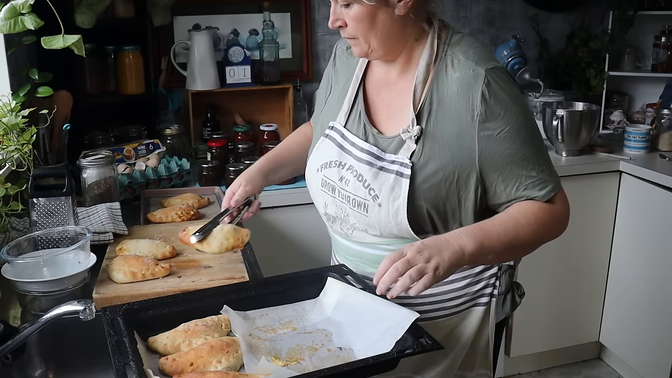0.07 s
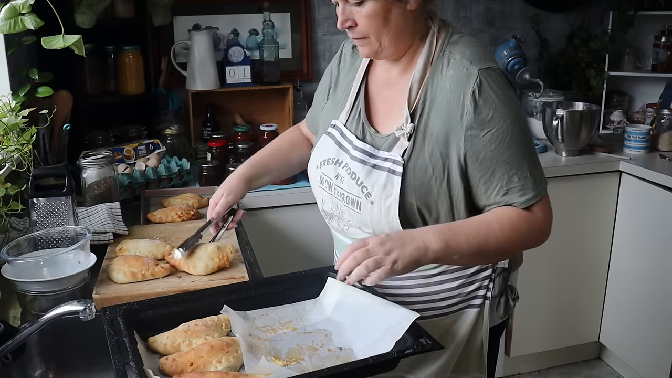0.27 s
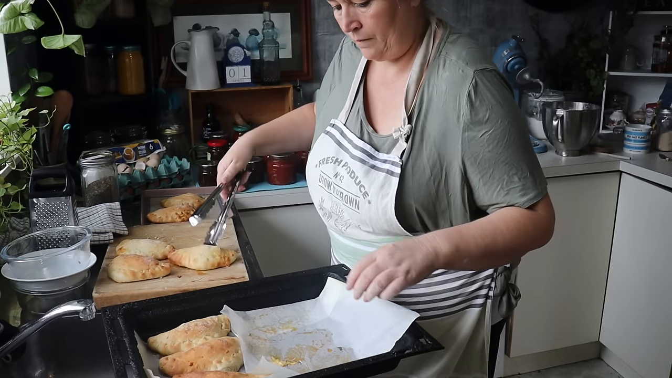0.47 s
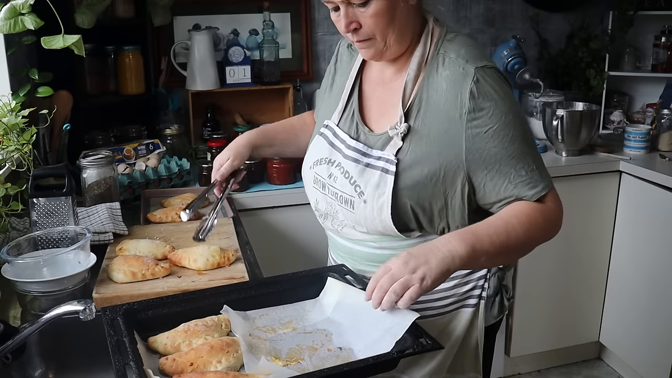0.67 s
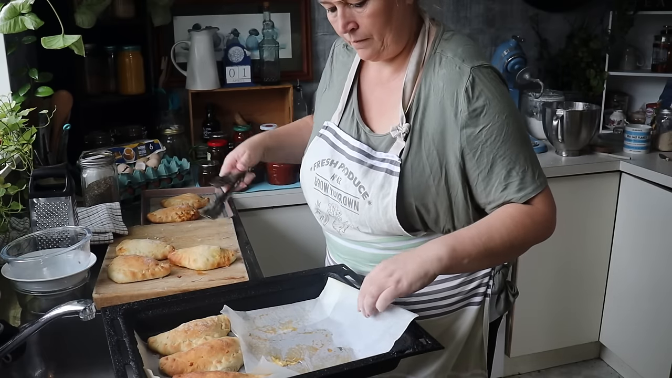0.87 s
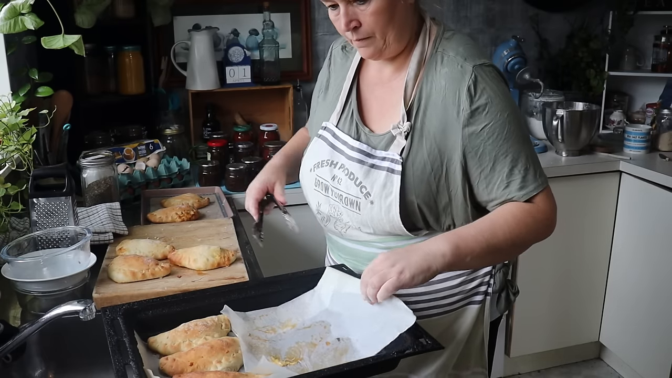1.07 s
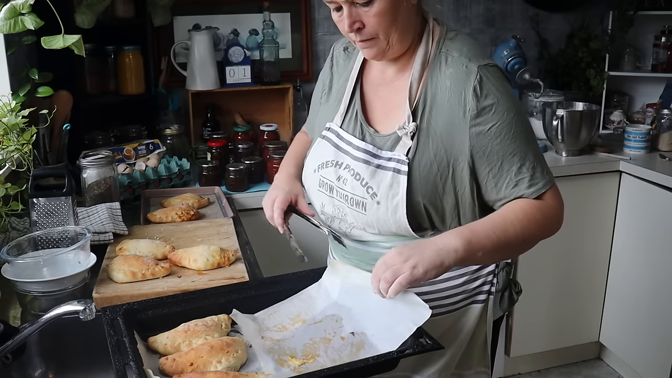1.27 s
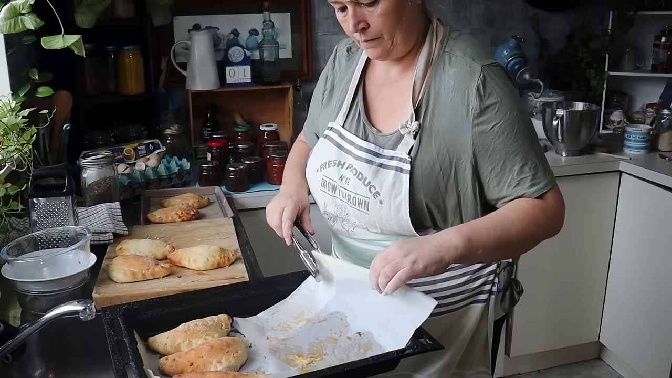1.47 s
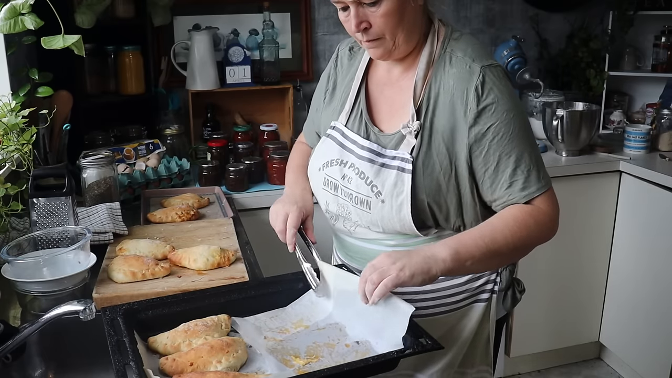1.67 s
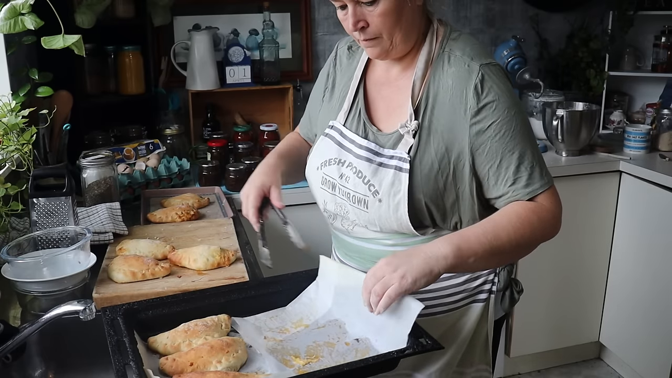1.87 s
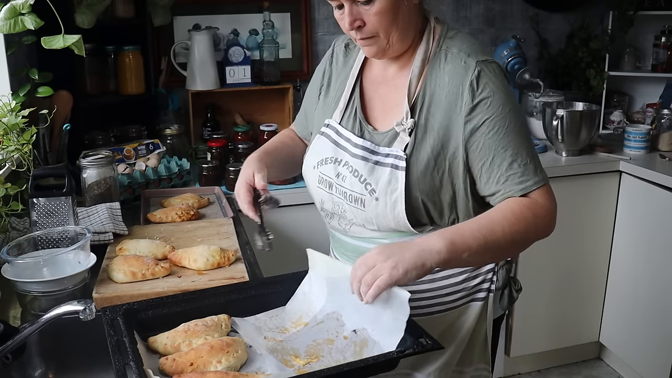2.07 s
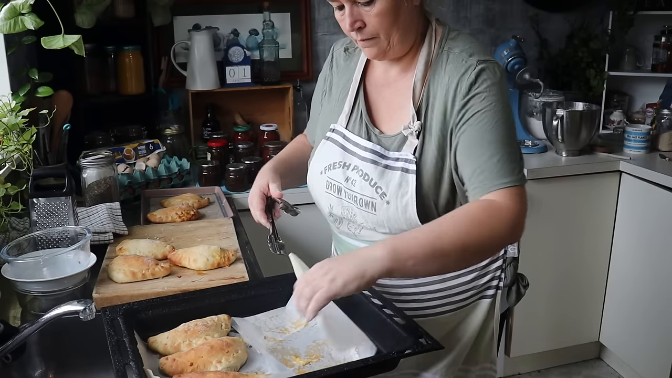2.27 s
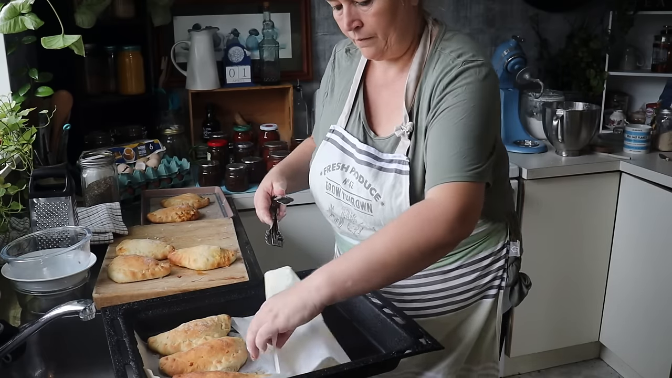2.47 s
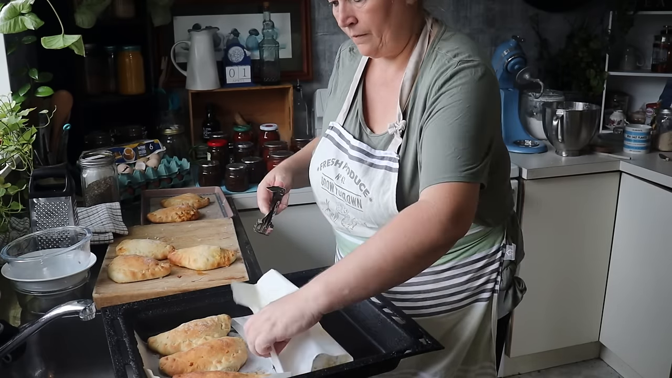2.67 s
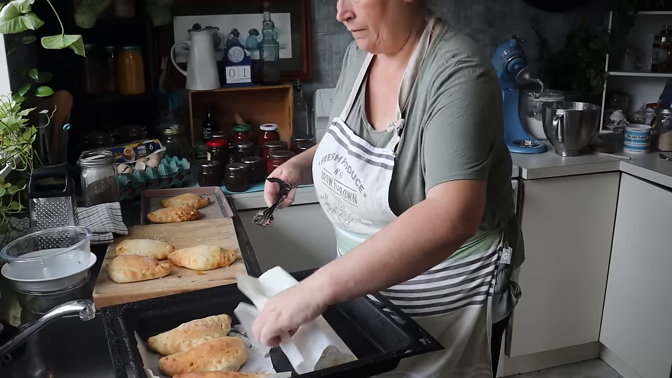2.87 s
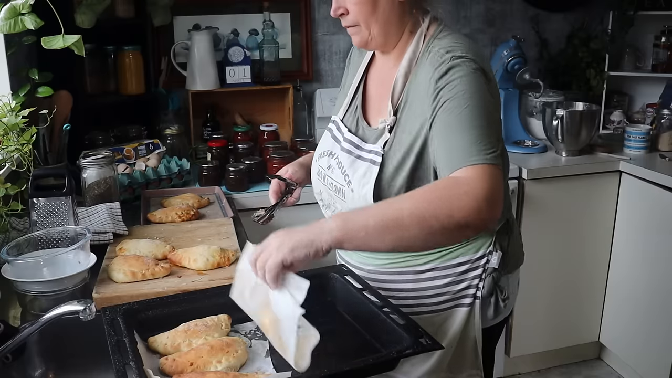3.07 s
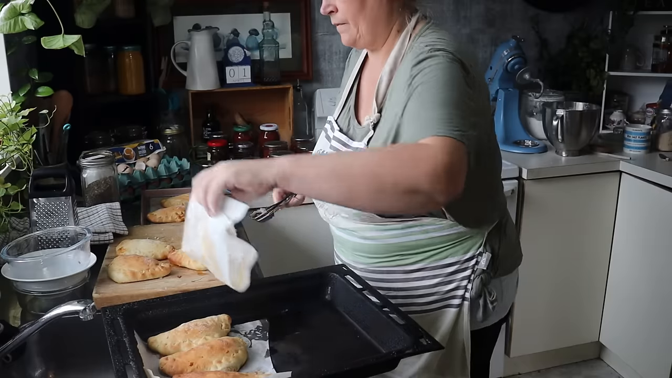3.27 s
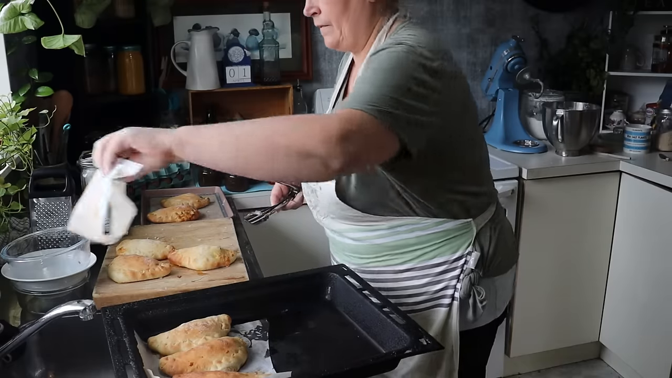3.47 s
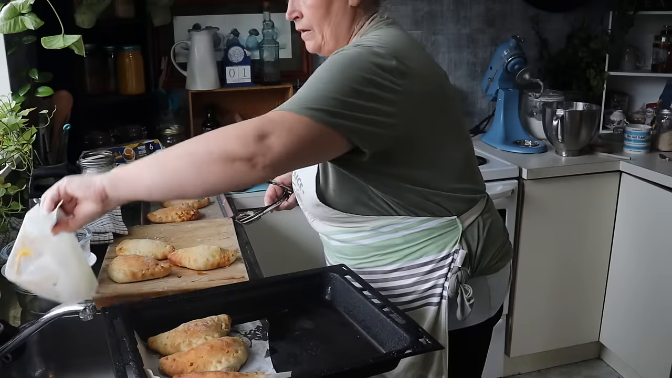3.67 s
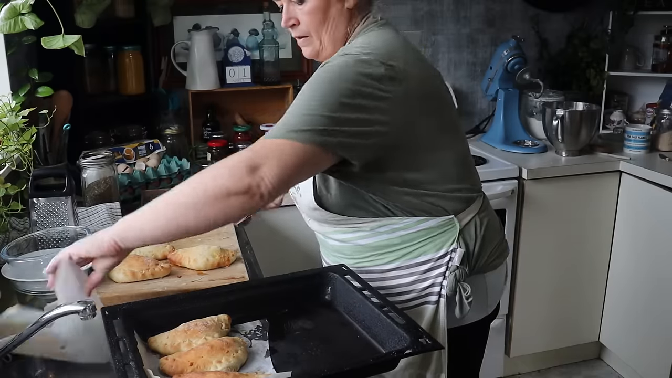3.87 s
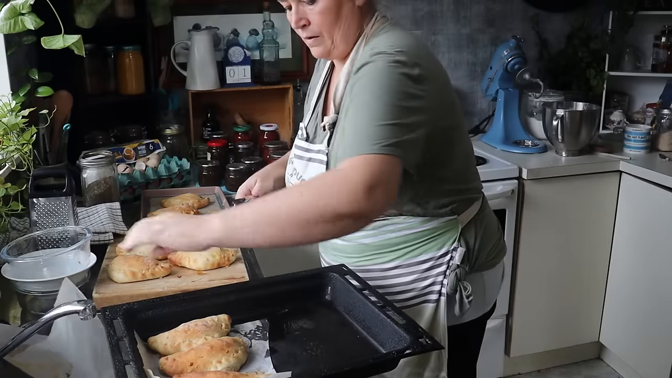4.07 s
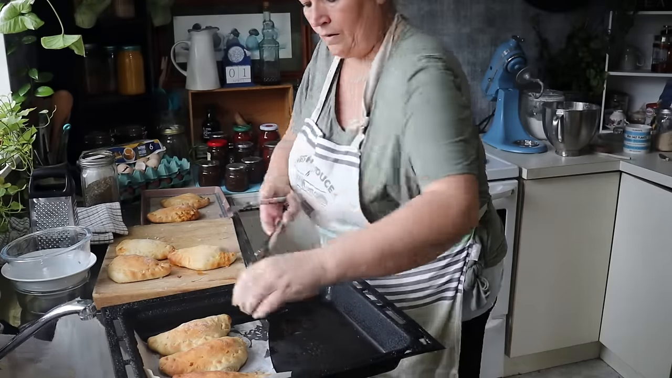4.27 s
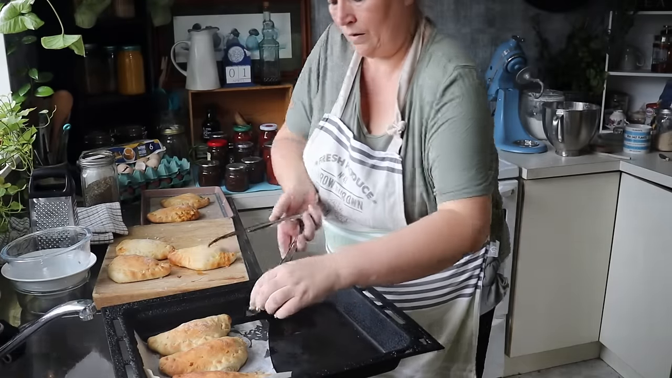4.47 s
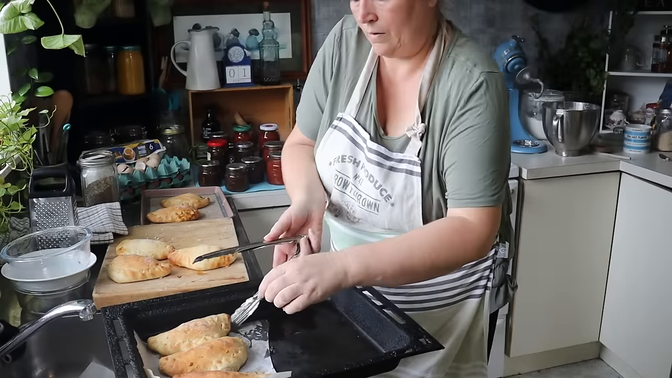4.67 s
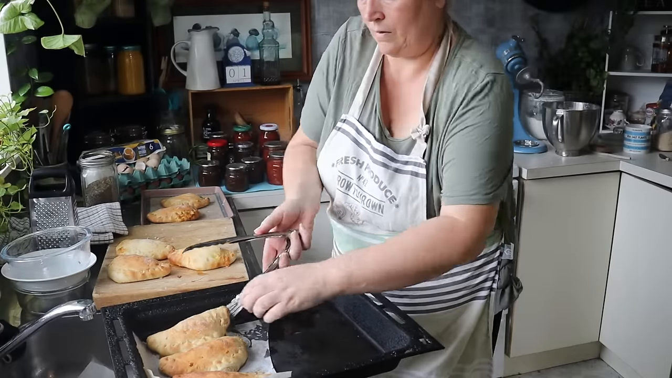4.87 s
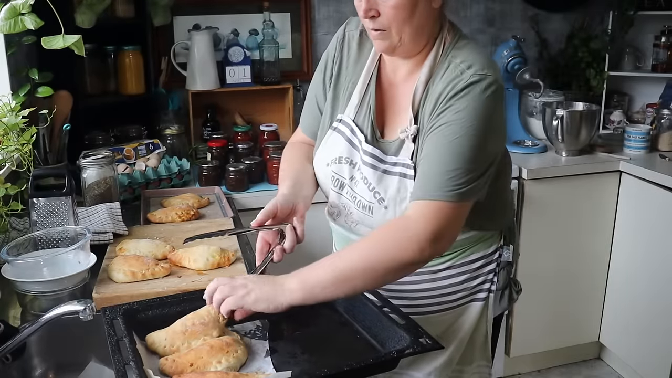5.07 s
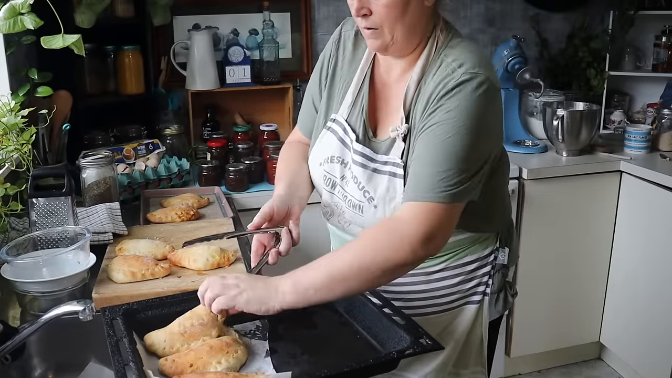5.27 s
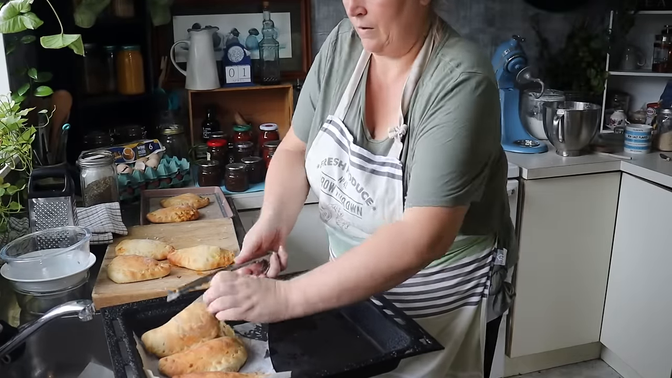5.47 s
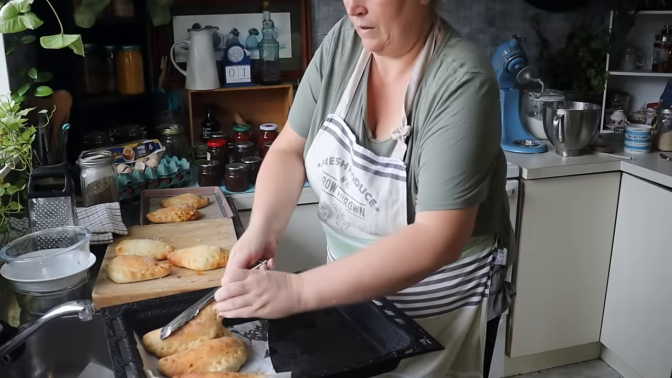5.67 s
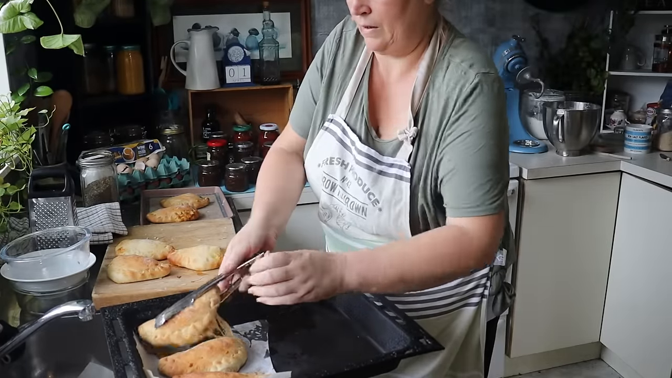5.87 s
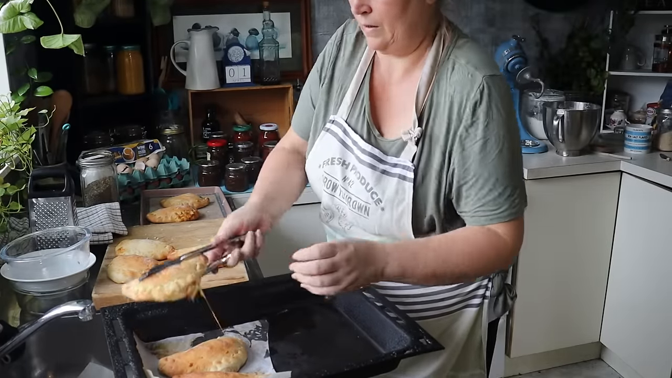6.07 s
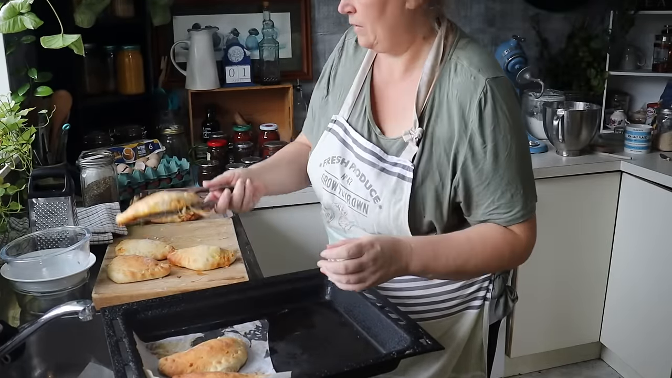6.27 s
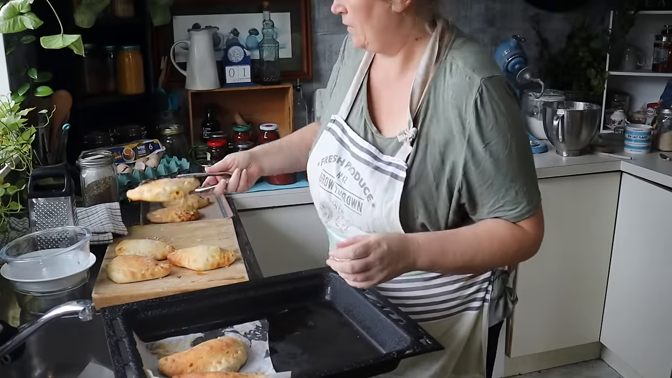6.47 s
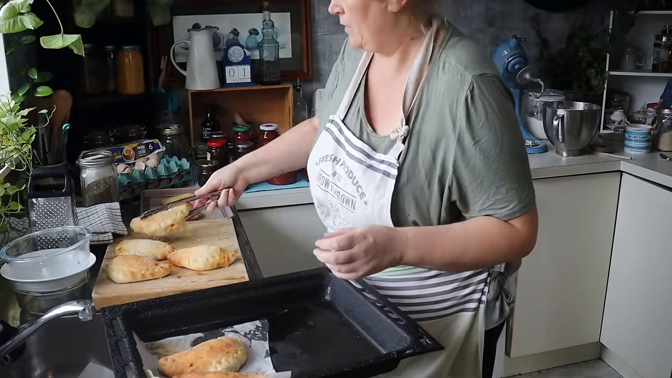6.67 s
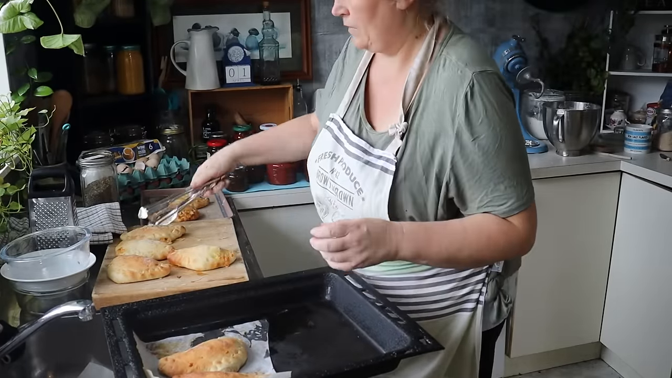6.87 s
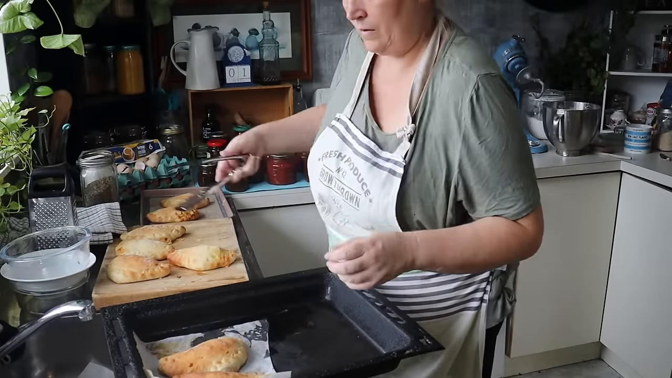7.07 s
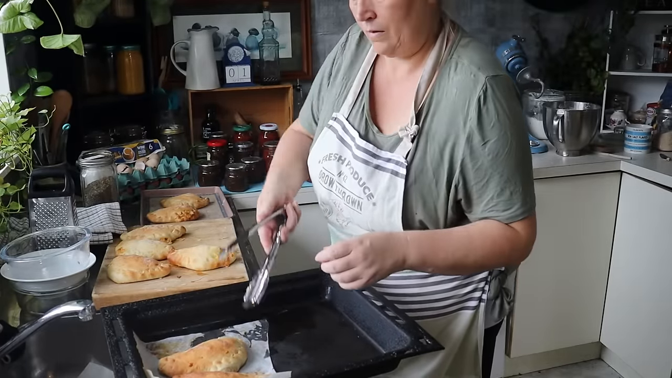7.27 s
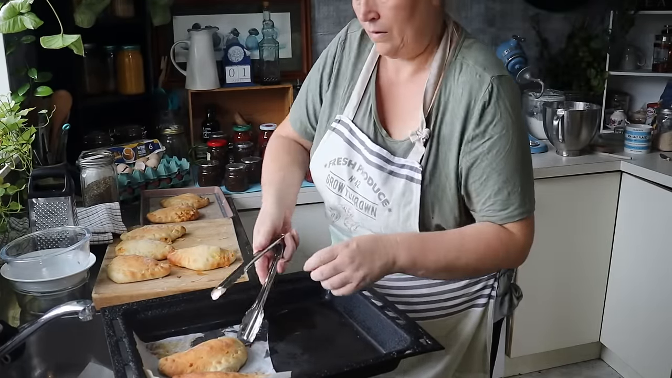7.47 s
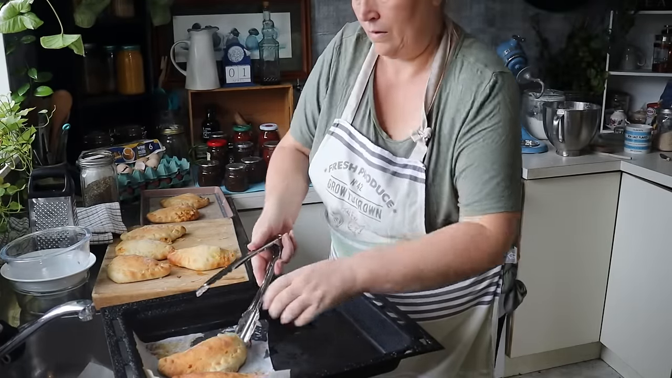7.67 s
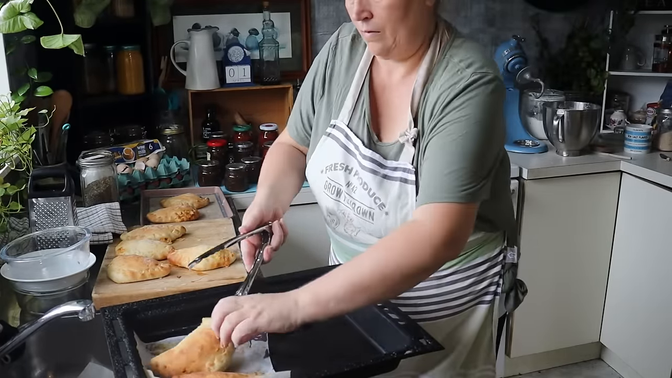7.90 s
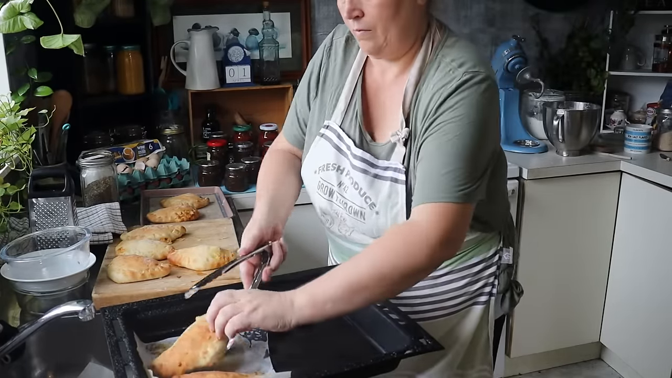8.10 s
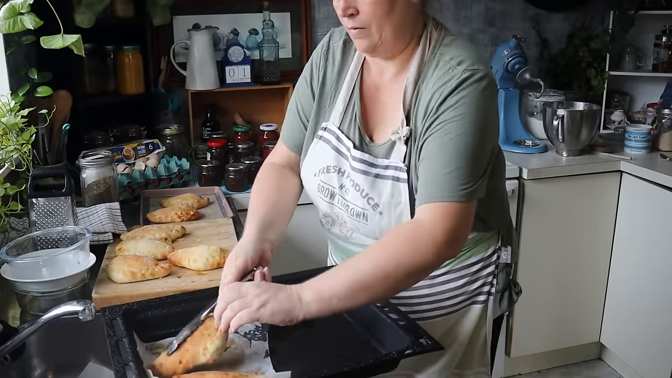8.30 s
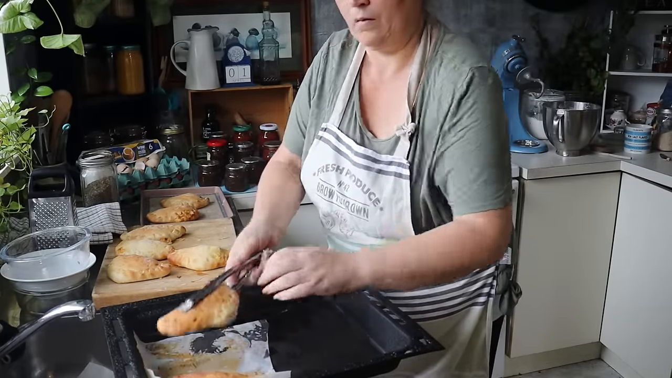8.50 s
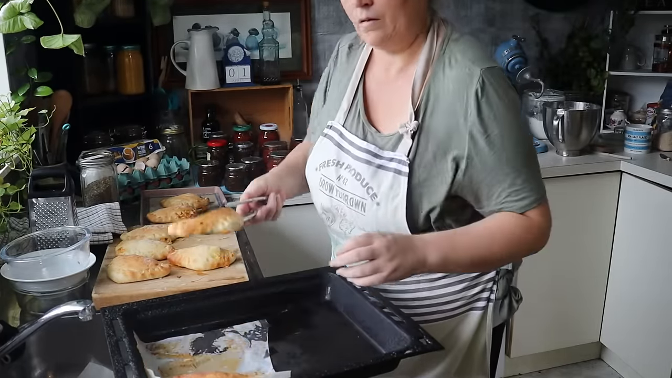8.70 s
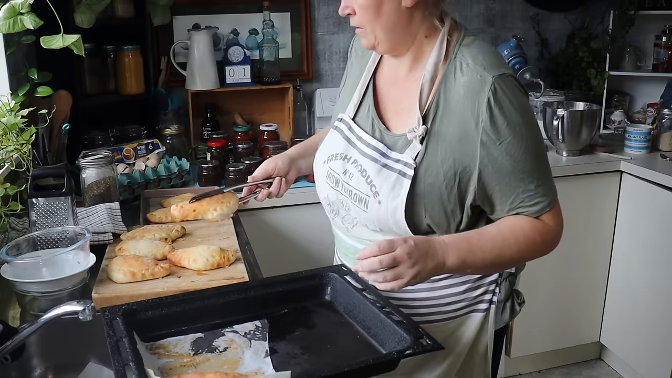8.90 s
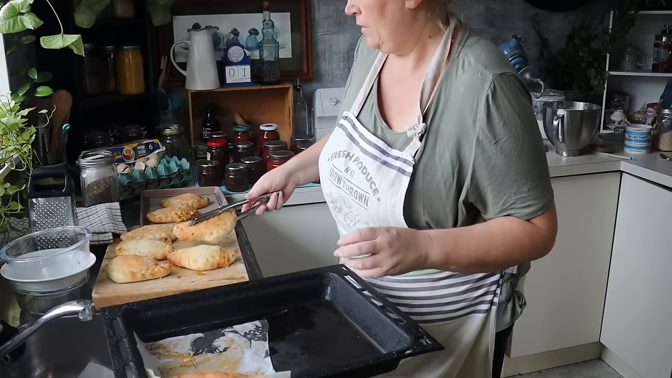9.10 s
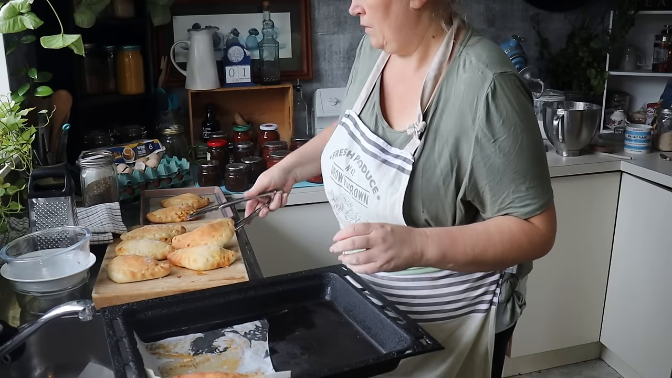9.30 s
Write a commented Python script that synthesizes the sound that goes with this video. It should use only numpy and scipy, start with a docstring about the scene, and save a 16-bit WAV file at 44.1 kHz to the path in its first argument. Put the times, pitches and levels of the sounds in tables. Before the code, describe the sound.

Close in a small, lively kitchen, steel tongs click brightly, then stiff baking paper rustles, snaps and crumples before its wad thumps into a ringing sink. A metal tray scrapes and rattles, dry crusts scratch and crack as pastries are moved, and one knocks dully on a wooden board. Behind, soft motor noise hums and a washer throbs low, rising into a faster spin.

```python
"""Pastries and baking paper in a kitchen

Steel tongs set baked pastries on a wooden board, a sheet of baking paper is crumpled off a metal tray
and dropped in the sink, the tray slides, then two more pastries are lifted across. Paper, scrapes and cracks
are made of tiny random bursts; tongs, tray, board and sink are short noises that set fading tones ringing,
all with room echoes. Behind them is soft motor noise, and a machine, probably a washer, that throbs once
per turn of its drum and speeds up into a spin.
"""
import sys
import numpy as np
from scipy import signal
from scipy.fft import rfft, irfft, next_fast_len
from scipy.io import wavfile
from scipy.ndimage import uniform_filter1d

SR = 44100
rng = np.random.default_rng(int(sys.argv[2]) if len(sys.argv) > 2 else 0)


def put_to_file(sound):
    """Save the sound as 16-bit audio at rate SR, in the file named by the first command-line argument."""
    columns = np.atleast_2d(sound).T  # one column per channel
    safe = np.clip(columns, -1, 1)
    whole_steps = np.round(safe * 32767)
    wavfile.write(sys.argv[1], SR, whole_steps.astype(np.int16))


N = 411894
TIME = np.arange(N) / SR   # seconds

# Handling sounds have a level (about 1.5-6 kHz), a body (lower sound) and a sheen (higher sound).
# Body and sheen are relative to the level. Each layer's gain_db is added to the levels in its table.


def from_db(db):
    """Turn decibels into a plain multiplier."""
    return 10 ** (np.asarray(db) / 20)


def rms_one(x):
    """Scale a signal to an average strength (rms) of 1."""
    return x / np.sqrt(np.mean(x ** 2) + 1e-20)


def read_log(points, x):
    """Read a curve between its points, on a logarithmic scale across, as pitch is heard."""
    xs, values = np.transpose(points)
    return np.interp(np.log(x), np.log(xs), values)


def tint(hz, body_db, sheen_db):
    """How many dB the body and sheen settings add at a frequency."""
    body_share = read_log([(800, 0.96), (2200, 0.014)], hz)
    sheen_share = read_log([(4000, 0), (9000, 0.98)], hz)
    return body_db * body_share + sheen_db * sheen_share


def drift(per_s):
    """A smooth random wander of spread about 1, with per_s new targets each second."""
    knots = np.arange(0, N / SR + 1, 1 / per_s)
    return np.interp(TIME, knots, rng.normal(0, np.sqrt(3 / 2), len(knots)))


def swell(t, start, rise_s, hold_s, release_s):
    """Loudness of one hand movement: a straight rise, a hold, then an exponential dying away."""
    rise = np.clip((t - start) / max(rise_s, .002), 0, 1)
    since_hold = np.maximum(t - start - rise_s - hold_s, 0)
    return rise * np.exp(-since_hold / release_s)


def resonance(x, hz, width_hz):
    """Let one frequency ring: a two-pole band-pass with gain 1 at its peak."""
    r = np.exp(-np.pi * width_hz / SR)
    top = np.array([1, 0, -1]) * (1 - r * r) / 2
    return signal.lfilter(top, [1, -2 * r * np.cos(2 * np.pi * hz / SR), r * r], x + 1e-18)


def add(track, s, sound):
    """Mix a sound into a track at time s."""
    start = int(s * SR)
    track[start:start + len(sound)] += sound[:N - start]


# How alike left and right are in diffuse sound, 1 = the same, -1 = opposite: f/Hz, likeness
LEFT_RIGHT_LIKENESS = [(170, 0.76), (350, 0.93), (700, 0.6), (1400, 0.35), (2800, -0.065), (6000, 0.3),
                       (14000, -0.24)]


def diffuse(gain_at, size):
    """Noise of a given spectrum arriving from all round; left and right agree more in some bands."""
    hz = np.maximum(np.arange(size // 2 + 1) * SR / size, 1)
    mid, side = rfft(rng.standard_normal((2, size))) * gain_at(hz)
    alike = np.clip(read_log(LEFT_RIGHT_LIKENESS, hz), -1, 1)
    return irfft(np.sqrt(1 + alike) * mid + np.sqrt(1 - alike) * side * [[1], [-1]], size)


# Half-octave band-pass filters: centre f/Hz, filter
EDGES = np.geomspace(150, 17000, 15)
BANDS = [(np.sqrt(lo * hi), signal.butter(2, [lo, hi], "band", fs=SR, output="sos"))
         for lo, hi in zip(EDGES, EDGES[1:])]


def crackle(moves, colour, release_s, per_s, spread_db, gain_db, clump_db=2.5, uneven_db=1.5):
    """Tiny buckles and slips at random moments while a hand moves, each with its own share of every band."""
    at = np.flatnonzero(rng.random(N) < per_s / SR)
    size = rms_one(from_db(spread_db * np.minimum(rng.exponential(1, len(at)), 4)))
    size = size * np.sqrt(SR / per_s)
    # buckles come in clumps, and the hand's pressure wavers
    unevenness = from_db(clump_db * drift(70) + uneven_db * drift(18))
    size = size * rms_one(unevenness[at])
    effort = np.array([swell(TIME[at], start, rise_s, hold_s, release_s)
                       for start, rise_s, hold_s, *_ in moves])
    level_db, body_db, sheen_db = np.transpose(moves)[3:]
    out = 0
    for hz, sos in BANDS:
        move_gain = from_db(level_db + tint(hz, body_db, sheen_db) + read_log(colour, hz))
        gain = np.sqrt(move_gain ** 2 @ effort ** 2)
        grains = np.bincount(at, gain * size * rng.standard_normal(len(at)), N)
        out = out + signal.sosfilt(sos, grains + 1e-18)
    return out * from_db(gain_db)


def contacts(rows, colour, gain_db):
    """Each contact is a noise burst of micro-impacts that fades; contact time is the fade's time constant."""
    t = TIME[:int(5 * SR * max(row[-1] for row in rows)) + SR // 50]
    s, level_db, body_db, sheen_db, contact_s = np.transpose(rows)[:, :, None]
    fade = (1 - np.exp(-t / 0.00025)) * np.exp(-t / np.maximum(contact_s, .0003))
    fade = fade / np.sqrt(np.sum(fade ** 2, axis=1, keepdims=True))   # same energy for any length
    bursts = 0
    for hz, sos in BANDS:
        noise = signal.sosfilt(sos, fade * rng.standard_normal(fade.shape) + 1e-18)
        bursts = bursts + noise * from_db(level_db + tint(hz, body_db, sheen_db) + read_log(colour, hz))
    out = np.zeros(N)
    for start, burst in zip(s[:, 0], bursts):
        add(out, start, burst * from_db(gain_db))
    return out


def struck(rows, modes, colour, contact_db, ring_db, rattle_db, rattle_s, split, count=3):
    """A contact noise, a fading rattle of loose parts, and ringing tones each split into close partners."""
    rattles = [(s, level_db, body_db + 1.5, sheen_db, rattle_s)
               for s, level_db, body_db, sheen_db, _ in rows]
    out = contacts(rows, colour, contact_db) + contacts(rattles, colour, contact_db + rattle_db)
    t = TIME[:SR // 2]
    hz, mode_db, t60 = np.repeat(np.transpose(modes), count, axis=1)[:, :, None]
    fade = np.exp(-np.log(1000) * t / t60)   # down 60 dB after t60
    for s, level_db, body_db, sheen_db, _ in rows:
        strength = from_db(ring_db + level_db + mode_db + tint(hz, body_db, sheen_db))
        strength = strength * rng.choice([-1, 1], hz.shape)
        pitch = hz * (1 + split * rng.standard_normal(hz.shape))   # grip and load detune every blow
        tones = strength * fade * np.sin(2 * np.pi * pitch * t)
        add(out, s, np.sum(tones, axis=0) / np.sqrt(count))
    return out


# Shape of the soft motor noise: f/Hz, relative level/dB per Hz
AIR_SHAPE = [(30, -22), (60, 1), (120, -8.5), (200, -8.5), (330, -11.5), (450, -14.5), (560, -15.5),
             (800, -15.5), (1200, -18.5), (2000, -16.5), (3200, -19), (6400, -33), (16000, -35)]
# Narrow resonances that it whirs in: f/Hz, width/Hz, relative level/dB
WHIR_PEAKS = [(516, 9.9, -1), (991, 16, -6), (1124, 21, -4), (1283, 34, -6.5), (1598, 50, -9.5),
              (1896, 60, -9), (2380, 29, -22)]


def background(air_db, whir_db, hum_hz, hum_db):
    """Soft motor noise with a few narrow resonances and one steady hum."""
    def whir_gain(hz):
        power = sum(from_db(2 * db) / (1 + (2 * (hz - centre) / width) ** 2)
                    for centre, width, db in WHIR_PEAKS)
        return np.sqrt(power)

    size = next_fast_len(N)
    air = rms_one(diffuse(lambda hz: from_db(read_log(AIR_SHAPE, hz)), size)[:, :N])
    whir = rms_one(diffuse(whir_gain, size)[:, :N])
    hum = np.sqrt(2) * np.sin(2 * np.pi * hum_hz * TIME)   # rms of 1
    return from_db(air_db) * air + from_db(whir_db) * whir + from_db(hum_db) * hum


# Drum tumbling, then running up to a spin, before the wobble: t/s, speed/turns per s
DRUM_TURNS = [(0, 10.58), (.6, 10.32), (1.4, 10.26), (2.2, 10.37), (5.25, 10.39), (5.7, 15.2), (5.95, 16.0),
              (6.15, 18.1), (6.35, 18.2), (6.65, 17.0), (7.15, 22.0), (8.15, 22.35), (8.8, 23.9),
              (9.34, 24.8)]
# How loudly the cabinet answers at each speed, before gain_db: speed/turns per s, level/dB
ANSWER_LOUDNESS = [(10.4, -43.2), (15, -39), (19, -38.5), (22.1, -37), (23, -40.5), (24.6, -40.5)]
# Shaking at multiples of the turning rate: multiple, relative level/dB
DRUM_SHAKE = [(1, -26), (2, -16), (3, -23), (4, -3), (5, 3), (6, 1.5), (7, -4.5), (9, -2), (10, -3),
              (12, -9.5), (16, -2.5)]
# Resonances of the machine's cabinet: f/Hz, width/Hz, relative level/dB
CABINET_MODES = [(62.6, 4.8, -0.5), (88.7, 18, -0.5), (109.7, 13.3, 6.5), (157.6, 13, -10.5),
                 (181, 100, -11.5), (253, 110, -17.5)]


def washer(wobble_turns, uneven_db, gain_db):
    """The unbalanced drum shakes its cabinet once a turn; as it speeds up the thumps merge into a hum."""
    turns_per_s = np.interp(TIME, *np.transpose(DRUM_TURNS))
    level_db = read_log(ANSWER_LOUDNESS, turns_per_s)
    turn = np.cumsum(turns_per_s) / SR + wobble_turns * drift(5)   # the shifting load makes the speed wobble
    cycle, orders = np.arange(512) / 512, np.arange(1, 17)
    one_turn = from_db(read_log(DRUM_SHAKE, orders)) @ np.cos(2 * np.pi * np.outer(orders, cycle))
    shaking = np.interp(turn, cycle, one_turn, period=1) * from_db(uneven_db * drift(40))
    boom = 0
    for k, (hz, width, db) in enumerate(CABINET_MODES):
        boom = boom + (-1) ** k * from_db(db) * resonance(shaking, hz, width)
    # even out the slow loudness, so that the loudness curve sets it
    power = uniform_filter1d(uniform_filter1d(boom ** 2, size=SR // 3), size=SR // 3)
    return boom / np.sqrt(power) * from_db(level_db + gain_db)


# The tongs' arms clicking: t/s, level/dB, body/dB, sheen/dB, contact time/s
ARM_CLICKS = [(0.3442, -13, -19, -16.5, 0.003), (0.717, -29.5, -9, 3, 0.0064),
              (0.7416, -26.5, -14, -6, 0.0042), (5.3018, -35.5, 4, 2.5, 0.003),
              (5.316, -35.5, -20, 1, 0.0024)]
# What the tongs ring with: f/Hz, relative level/dB, t60/s (time to fade by 60 dB)
TONG_MODES = [(2710, -15, .16), (2820, -2.5, 0.15), (2980, -5, 0.052), (3600, -15, .16), (4220, -8, .2),
              (4530, 0, 0.15), (5590, 2, 0.17), (6750, -5, 0.13), (6950, -12, .12), (7600, -7, .14),
              (9000, -10, .16), (10200, -2, 0.15), (11300, -9, .17)]
# Colour of steel rattling on steel: f/Hz, relative level/dB per Hz
STEEL_TINT = [(170, 12), (400, -1), (900, 6), (1800, -9), (2800, -1), (4500, -2.5), (6500, 10.5),
              (10000, -9.5), (15500, -2.5)]


def tongs_clicking():
    """Steel arms click together: a short rattle and bright, quickly fading tones."""
    return struck(ARM_CLICKS, TONG_MODES, STEEL_TINT, contact_db=26.0, ring_db=-10.5,
                  rattle_db=-6.0, rattle_s=0.023, split=0.0057)


# Dry scrapes: the tray sliding at 4.46-4.8 s, otherwise crust on tongs and board:
# start t/s, rise/s, hold/s, level/dB, body/dB, sheen/dB
DRY_SCRAPES = [(.41, 0.027, 0.018, -36.5, -14, -2), (.51, 0.0093, 0.012, -40, 0.5, -5),
               (4.46, 0.037, .015, -32, -6, -3), (4.565, 0.014, .06, -31.5, -7, -3.5),
               (4.7, 0.028, 0.057, -30, -6.5, -4), (4.8, .03, 0.074, -46.5, -5, -9),
               (5.55, 0.016, .06, -49, 1, -2), (5.655, .02, .115, -34.5, -11.5, 1),
               (5.87, 0.031, 0.031, -44.5, 0, -6), (6.08, 0.017, 0.031, -67, -6, 5),
               (6.81, 0.069, 0.064, -31.5, -9.5, -7), (7.93, 0.038, 0.23, -42, -5.5, 1.5),
               (8.03, 0.019, 0.022, -31.5, -14, -3), (8.27, 0.052, 0.064, -54, 7, 2.5),
               (8.385, 0.029, .05, -40.5, 1, -2.5), (8.465, 0.024, 0.013, -34.5, -7, -1)]
# Crust cracking or landing, and one sharp tong snap at 8.05 s:
# t/s, level/dB, body/dB, sheen/dB, contact time/s
CRACKS_AND_SNAP = [(0.5247, -30, -19, -2, 0.0058), (5.205, -38.5, 1, -11, 0.0067), (5.257, -41, 6, 1, 0.02),
                   (5.4806, -43.5, -9, -6, 0.0058), (5.6595, -31, 0, 0, 0.004),
                   (6.336, -27.5, -14, -8.5, 0.017), (6.8744, -14.5, -38, -14, 0.021),
                   (7.868, -26, -20, -11, 0.022), (7.9658, -25.5, -12, -32, 0.0076),
                   (8.0484, -21.5, -15, 8, 0.00056), (8.131, -39, -12, 11, 0.0019),
                   (8.389, -27, -19, -12, 0.0045), (8.4163, -34, -9, -19, 0.0076),
                   (8.491, -25, -14, 5.5, 0.0058), (9.2668, -37.5, 2, -0.5, 0.017),
                   (9.3044, -20, -12, -24, 0.0092)]
# Colour of these dry noises, also used for tray and sink contacts: f/Hz, relative level/dB per Hz
DRY_TINT = [(170, 3.5), (300, 3.5), (500, 3), (900, 0.5), (1700, -1), (3000, -2), (5000, 1), (7000, 1.5),
            (10000, -4.5), (15500, -7)]


def scrapes_and_cracks():
    """Crust or the sliding tray scrapes in dense small slips; crust cracks, landings and a tong snap are bursts."""
    scraping = crackle(DRY_SCRAPES, DRY_TINT, release_s=.025, per_s=2200, spread_db=2.5, gain_db=8.0)
    return scraping + contacts(CRACKS_AND_SNAP, DRY_TINT, gain_db=27.5)


# Moves of the baking paper: start t/s, rise/s, hold/s, level/dB, body/dB, sheen/dB
# In order: fingers find the edge, corner lifted, edge folded over, sheet peeled up, pinched, grabbed,
# gathered, crumpled, lifted clear, carried, pushed into the sink, wad springs open, and settles.
SHEET_MOVES = [(.918, .01, .55, -43.5, -12.5, -0.5), (.99, .012, .24, -36.5, -14, -5),
               (1.51, .13, 0.039, -22.5, -11.5, -4), (1.72, 0.053, 0.5, -37, -10, -3),
               (2.265, 0.044, .02, -32, -4.5, -9), (2.336, 0.0055, 0.037, -24.5, -7.5, -0.5),
               (2.44, 0.025, 0.35, -31, -10, -4), (2.69, 0.049, 0.43, -28, -6.5, -6),
               (3.3, 0.057, 0.042, -40.5, -1, -6), (3.49, 0.085, 0.13, -36.5, -4.5, -8),
               (3.84, 0.086, 0.17, -25.5, -7.5, -0.5), (4.15, 0.034, 0.095, -36.5, -3, -3.5),
               (4.35, 0.013, .09, -37, -3.5, -1.5)]
# The loudest creases: t/s, level/dB, body/dB, sheen/dB
CREASES = [(1.0, -24, -28, -5), (1.0115, -17.5, -21, -3), (1.205, -19, -17, -20), (1.6077, -19, -12, -18),
           (1.6371, -10, -22, -8), (1.6702, -13, -34, -16), (1.7214, -15.5, -17, -3.5),
           (1.8391, -22.5, -43.5, -2), (1.9903, -14.5, -14, -2), (2.0677, -20, -6, -13),
           (2.121, -22.5, -19, -2.5), (2.1543, -19, -19, -25), (2.3415, -10, -29, 0),
           (2.383, -12, -30, -10), (2.4627, -12.5, -8, -11), (2.5397, -13, -8.5, -14),
           (2.724, -19, -20, -6), (2.83, -17, -8, -10), (3.1594, -22.5, -13, 5.5),
           (3.2864, -22, -11.5, -7.5), (3.3279, -24, -11, -3.5), (3.4984, -25, -19, 6),
           (3.5141, -21, -13, 1.5), (3.6492, -30, -25, 5.5), (3.799, -28.5, -13, -5),
           (3.9662, -16.5, -26, 6), (4.2474, -20.5, -7, 3.5)]
# Colour of paper noise: f/Hz, relative level/dB per Hz
PAPER_TINT = [(170, -8.5), (330, -5.5), (480, -2), (700, 6), (1050, 0.5), (1600, 2.5), (2600, 1), (4000, 2),
              (6000, -0.5), (10000, -2), (15500, -8)]


def baking_paper():
    """Stiff paper buckles in many tiny jumps as it is moved; the biggest creases snap through."""
    rustle = crackle(SHEET_MOVES, PAPER_TINT, release_s=0.047, per_s=1300, spread_db=4.5,
                     gain_db=7.0, clump_db=2.0, uneven_db=1.0)
    snap_s = .002   # contact time of a crease
    return rustle + contacts([(*crease, snap_s) for crease in CREASES], PAPER_TINT, gain_db=26.5)


# Sheet metal shuddering as things drag over it: start t/s, rise/s, hold/s, level/dB
METAL_SHUDDERS = [(3.557, 0.038, 0.16, -45.5), (3.86, 0.044, 0.17, -34), (4.457, 0.025, 0.051, -34),
                  (4.73, 0.018, .04, -55), (4.9, 0.11, .12, -50.5)]


def shudder(hz, width_hz, gain_db):
    """Friction shakes the lowest mode of the sheet metal: narrow noise that swells with each drag."""
    effort = sum(from_db(db) * swell(TIME, start, rise_s, hold_s, release_s=.035)
                 for start, rise_s, hold_s, db in METAL_SHUDDERS)
    shake = resonance(rng.standard_normal(N), hz, width_hz)
    shake = rms_one(resonance(shake, hz, width_hz))   # a second pass narrows it
    return shake * effort * from_db(gain_db)


# The wad of paper hitting the sink: t/s, level/dB, body/dB, sheen/dB, contact time/s
WAD_HITS = [(4.0563, -15.5, -5.5, 1, 0.0013), (4.0889, -23, -14.5, -14, 0.002)]
# What the sink rings with: f/Hz, relative level/dB, t60/s
SINK_MODES = [(175, -2, .2), (268, -3.5, 0.37), (550, -5, 0.32), (933, 4, 0.16), (1130, -1, 0.19),
              (1304, 3.5, 0.12), (1387, 4.5, 0.12), (2300, -2, 0.2), (2780, -11, .16)]


def sink_drop():
    """The paper wad lands and sets the sink ringing."""
    return struck(WAD_HITS, SINK_MODES, DRY_TINT, contact_db=30.0, ring_db=-8.0,
                  rattle_db=-15.0, rattle_s=0.023, split=0.0193)


# Tongs touching the tray: t/s, level/dB, body/dB, sheen/dB, contact time/s
TRAY_TOUCHES = [(4.5643, -21.5, -10.5, 0, 0.0069), (4.583, -15, -15, -31, 0.0019),
                (4.6573, -16.5, -20.5, -15, 0.005), (4.7139, -18.5, -19, -3, 0.0043),
                (4.8192, -29.5, -22, 4, 0.0048), (4.8741, -24.5, -11, -5.5, 0.0011),
                (7.4666, -16.5, -8.5, -5.5, 0.0045)]
# What the tray rings with: f/Hz, relative level/dB, t60/s
TRAY_MODES = [(286.6, 13, 0.27), (979, 7.5, 0.12), (1237, 10, 0.094), (1473, 9, 0.085), (1804, -3, 0.58),
              (1992, 4, 0.16), (3677, -13, 0.35), (4140, -25, 0.39), (5100, -9, .23), (5800, 7, 0.087)]


def tray_taps():
    """Tongs touch the metal tray, which rattles and rings."""
    return struck(TRAY_TOUCHES, TRAY_MODES, DRY_TINT, contact_db=27.0, ring_db=-15.5,
                  rattle_db=-4.5, rattle_s=0.081, split=0.0073)


# A knock on the board: t/s, level/dB, body/dB, sheen/dB, contact time/s
KNOCKS = [(6.9834, -14, -2, -13, 0.0028)]
# What the wooden board rings with: f/Hz, relative level/dB, t60/s
BOARD_MODES = [(203, -19, .1), (267, 1, .1), (384, -9, .12), (496, -6, 0.13), (710, -11, .14),
               (1445, -15, 0.089), (1530, 7, 0.13), (1660, 3, 0.067), (1840, -5, 0.11), (1850, -15, .14),
               (2590, -9, 0.17), (3666, -19, .1)]
# Colour of a dull blow: f/Hz, relative level/dB per Hz
THUD_TINT = [(170, 2), (280, 7), (450, 6.5), (700, 5), (1000, 1), (1550, 10), (2200, -1.5), (3500, -2),
             (6000, -16), (15500, -29)]


def board_knock():
    """A dull blow sets the wooden board ringing for a moment."""
    return struck(KNOCKS, BOARD_MODES, THUD_TINT, contact_db=28.0, ring_db=-12.5,
                  rattle_db=-7.5, rattle_s=0.016, split=0.025)


# How long the kitchen's tail lasts: f/Hz, t60/s
ROOM_T60 = [(170, 0.22), (550, 0.31), (1400, 0.42), (3700, 0.36), (9000, 0.33), (15000, 0.35)]


def reflections(early_s, tail_db):
    """The room's answer from one spot: quick echoes off worktop and cupboards, then a short tail."""
    t = TIME[:SR // 3]
    noise = [diffuse(np.ones_like, len(t)) for _ in range(2)]   # neighbouring bands get unrelated noise
    echoes = 0
    for k, (hz, sos) in enumerate(BANDS):
        tail = from_db(tail_db - 60 * t / read_log(ROOM_T60, hz))
        echoes = echoes + signal.sosfilt(sos, noise[k % 2]) * (np.exp(-t / early_s) + tail)
    echoes = echoes * (t > .001)   # nothing comes back in the first millisecond
    return echoes / np.sqrt(np.sum(echoes ** 2) / 2)


def kitchen(x, direct_db, early_s, tail_db, spots=3):
    """Direct sound reaches the left first; the echoes keep shifting as the hands move between spots."""
    nearness = np.array([drift(30) for _ in range(spots)])
    nearness = nearness / np.sqrt(np.sum(nearness ** 2, axis=0))
    wet = 0
    for near in nearness:
        wet = wet + signal.oaconvolve((x * near)[None], reflections(early_s, tail_db), axes=1)[:, :N]
    direct = np.array([x, np.roll(x, 3)])   # right side 3 samples late
    return (wet + from_db(direct_db) * direct) / np.hypot(1, from_db(direct_db))


def scene():
    """Paper, pastry, metal and wood sound in the room, over the washer and the motor noise."""
    behind = background(air_db=-49.5, whir_db=-53.0, hum_hz=167.0, hum_db=-58.0)
    machine = washer(wobble_turns=0.03, uneven_db=1.5, gain_db=-1.5)
    machine = machine * from_db([[.4], [-.4]])   # slightly louder on the left
    hands = tongs_clicking() + scrapes_and_cracks() + baking_paper()
    hands = hands + shudder(hz=293, width_hz=150, gain_db=-3.0)
    hands = hands + sink_drop() + tray_taps() + board_knock()
    return kitchen(hands, direct_db=-4.5, early_s=0.013, tail_db=-3.5) + machine + behind


def record(dry):
    """Cut the top steeply above 16.1 kHz."""
    return signal.sosfilt(signal.ellip(12, .1, 80, 16100, fs=SR, output="sos"), dry)


dry = scene()
out = record(dry)
put_to_file(out)
```